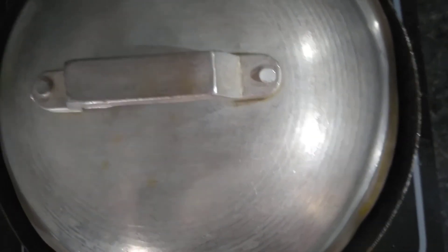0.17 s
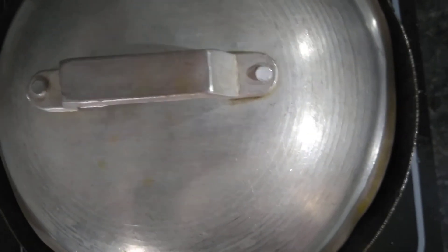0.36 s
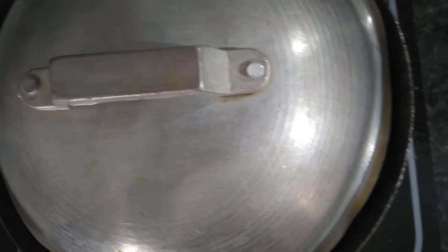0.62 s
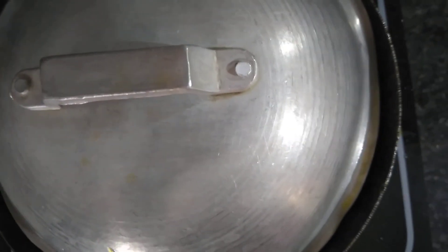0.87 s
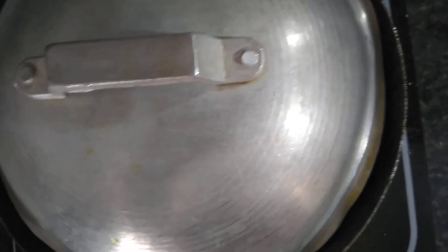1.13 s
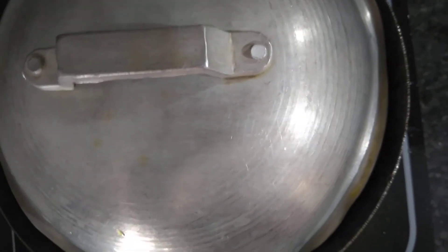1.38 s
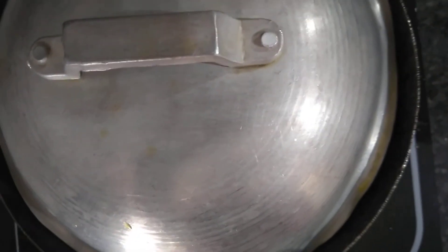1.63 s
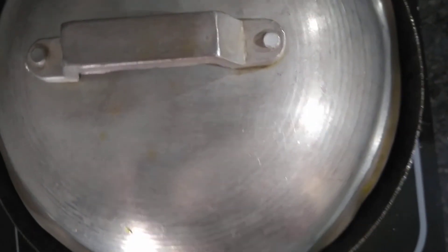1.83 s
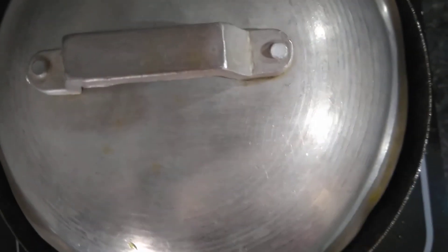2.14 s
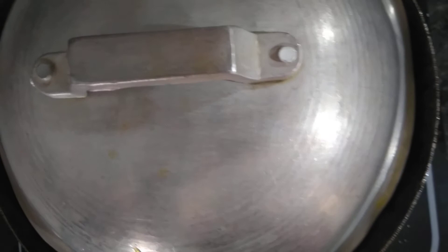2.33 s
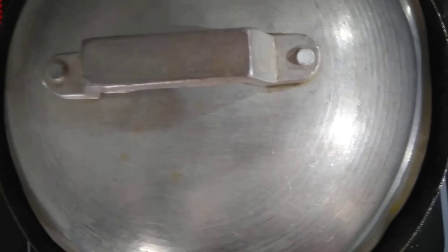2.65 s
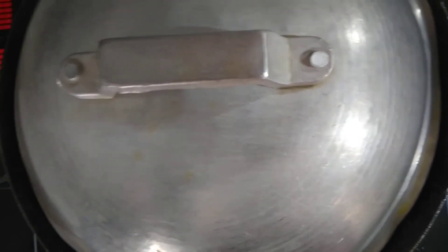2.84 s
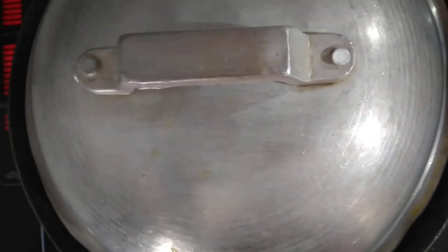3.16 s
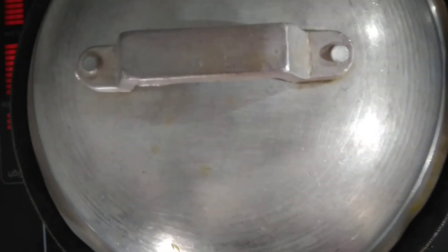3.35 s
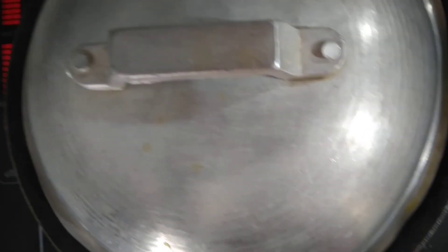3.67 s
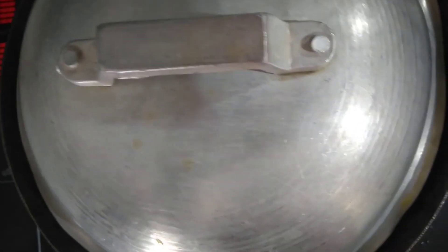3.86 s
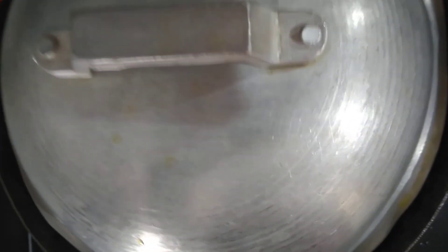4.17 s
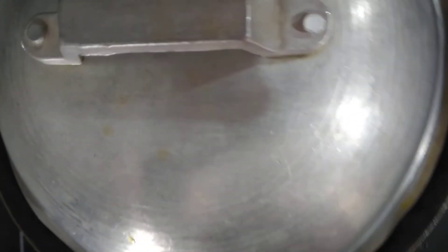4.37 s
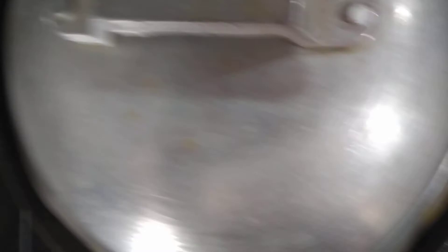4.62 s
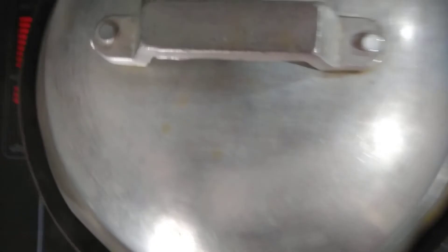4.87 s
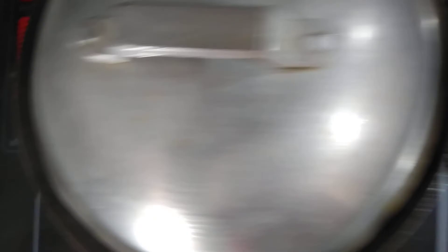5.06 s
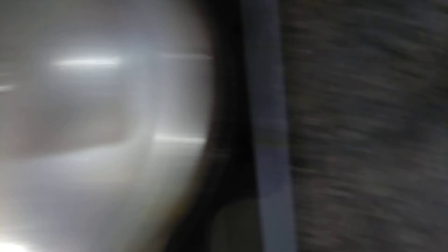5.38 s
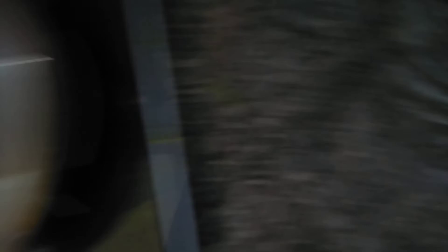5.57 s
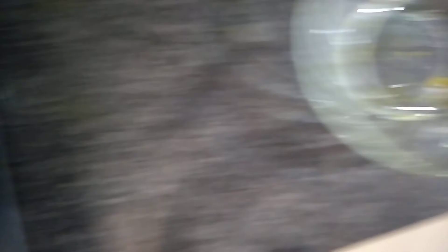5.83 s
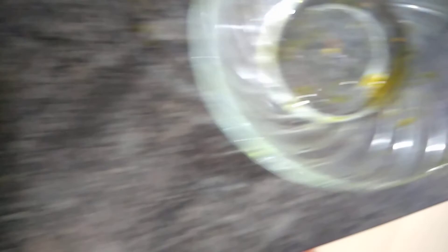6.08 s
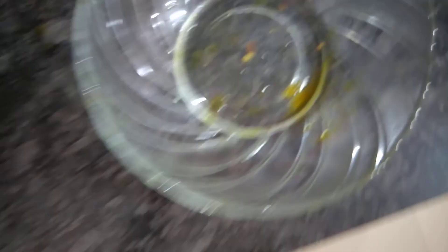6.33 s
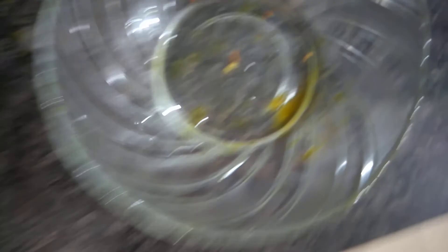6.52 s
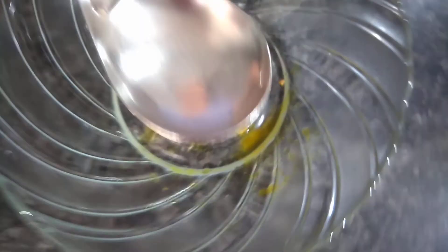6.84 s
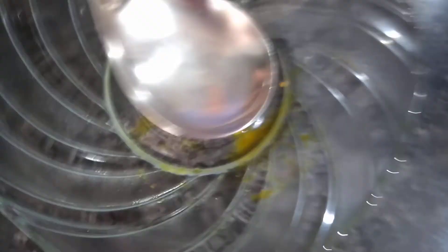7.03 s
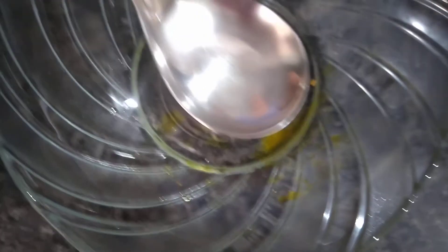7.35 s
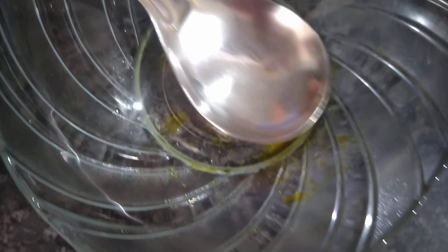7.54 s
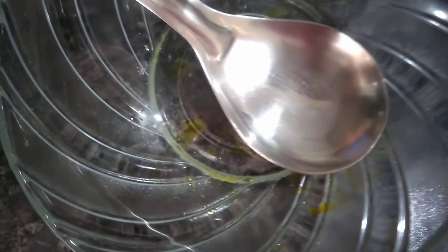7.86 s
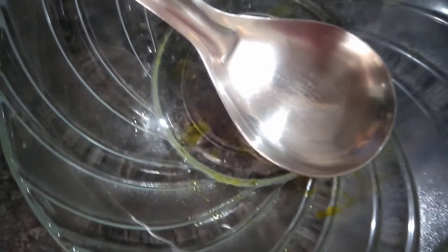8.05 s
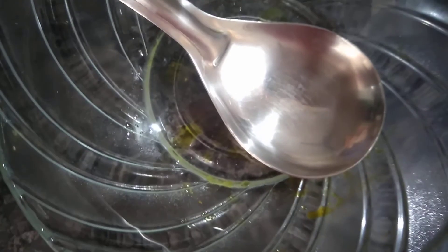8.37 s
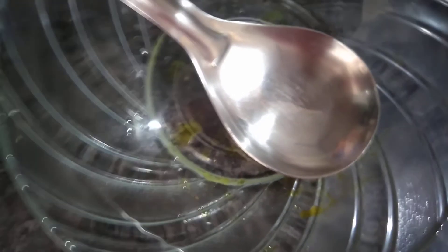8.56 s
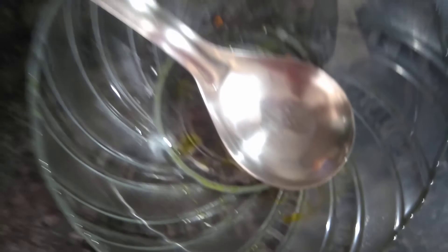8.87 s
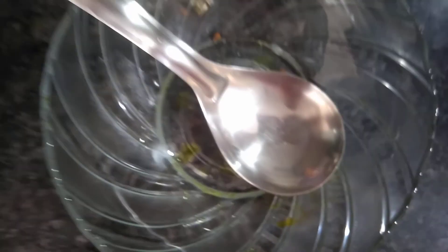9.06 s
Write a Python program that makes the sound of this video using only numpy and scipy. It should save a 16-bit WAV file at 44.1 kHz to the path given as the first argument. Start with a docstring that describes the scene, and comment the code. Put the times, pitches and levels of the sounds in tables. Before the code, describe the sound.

A handheld stereo microphone hovers over a lidded pan: hollow low bubbles, small pops, foamy crackle and wet hissing spits, with a soft fan underneath. A few bright clinks of cutlery, a tick and a sharp metal dish clank interrupt. As it swings away past the fan vent, a thin whine swells, the boil fades, gritty spoon slides follow, then a rapid ringing rattle of spoon in glass.

```python
"""Curry boiling under a lid

Curry boils under a steel lid on an electric cooktop whose fan hums; the microphone drifts from the pan to the counter.
Big bubbles glug in the air under the lid, small ones pop at their own pitches, and wet spits hiss at the rim.
Cutlery and a steel dish clink and rebound as groups of ringing modes, with rattling noise around them.
A spoon is slid off the counter with gritty noise and rattles into a glass bowl, whose foot rocks on the stone."""
import sys
import numpy as np
from scipy import signal
from scipy.fft import rfft, irfft, next_fast_len
from scipy.io import wavfile
from scipy.ndimage import uniform_filter1d, map_coordinates

SR = 44100
rng = np.random.default_rng(int(sys.argv[2]) if len(sys.argv) > 2 else 0)


def to_wav(s):
    """Save 16-bit WAV."""
    ch = np.atleast_2d(s).T  # columns
    pcm = np.round(np.clip(ch, -1, 1) * 32767)  # PCM
    wavfile.write(sys.argv[1], SR, pcm.astype(np.int16))


N = 405719

# clear modes (single ringing pitches) of each utensil, the glass bowl and its foot: (pitch [Hz], level [dB])
FORK = [(5816, -10.5), (7953, -10), (8430, -3), (9017, 2), (9342, 0), (9983, -6), (10214, -7), (10475, 2.5),
        (11872, -1), (12311, -8), (12798, -5), (13995, 1.5)]
SPOON = [(1790, -17), (2613, -20.5), (2820, -19), (3536, -6), (5776, -15.5), (6861, -7.5), (7980, -17),
         (8422, -4), (9345, 2.5), (10240, -10), (10440, -13), (12460, -1), (12927, -21), (14195, -14)]
TEA_SPOON = [(4990, -12), (5805, -8), (9959, -2), (10222, -3), (11894, -7), (12817, 0)]
STEEL_DISH = [(1900, -13), (3040, -8.5), (3890, -10), (6715, -4.5), (7495, -1), (7815, -16), (9350, -0.5),
              (9883, -7), (10256, -6), (11960, -7)]
GLASS_BOWL = [(654, -14), (1055, -4.5), (1170, -7), (2430, -6), (4480, -12.5), (6878, -2), (8430, -3),
              (9028, -3.5), (9366, -7), (9830, 0), (10480, -4)]
BOWL_FOOT = [(1039, -13), (1560, -2), (3908, -5), (4486, -4), (4710, -4.5)]
KNIFE = [(4030, 0), (5450, -2)]
# each utensil's crowd of weaker modes: (frequency [Hz], level [dB per Hz])
FORK_CROWD = [(5000, -14.5), (6200, -4), (6900, 3), (9500, -2), (13000, -5.5), (15800, -9)]
SPOON_CROWD = [(1000, -19), (3450, -10.5), (4240, -14), (5650, -6.5), (8160, -4), (15500, -7)]
STEEL_DISH_CROWD = [(700, -17), (1850, -12.5), (5500, -10), (7200, -6), (12500, -9), (15800, -18)]
GLASS_BOWL_CROWD = [(560, -7), (1200, 3), (2300, -5), (5700, -6), (6800, -0.5), (7600, -12), (8300, -2.5),
                    (10500, -5), (11200, -7), (12000, -4), (15800, -14)]
BOWL_FOOT_CROWD = [(550, -7), (1400, -10), (2700, -19.5), (4400, -4), (6000, -33)]
KNIFE_CROWD = [(2800, -20), (4000, -2), (9500, 4.5), (12000, -2), (13500, -21)]
# spectrum of hissing steam, spits and scrapes: (frequency [Hz], level [dB per Hz])
HISS = [(1500, -27), (4000, -8), (6500, 0.5), (9500, 0), (12000, -9.5), (15500, -19)]
TOP_HZ = 16000  # nothing much above this passes the microphone
BLUR_HZ = 87  # chatter and room widen each utensil mode into a band


def amp(db):
    """Decibels to gain."""
    return 10 ** (np.asarray(db) / 20)


def unit(x):
    """Scale to an rms (average strength) of 1."""
    return x / np.sqrt(np.mean(x ** 2) + 1e-20)


def along(points, hz):
    """Values at hz from (Hz, value) points joined on a log axis."""
    point_hz, value = np.transpose(points)
    return np.interp(np.log(hz + 1), np.log(point_hz + 1), value)


def wobble(rate):
    """A smooth random curve with rate knots a second."""
    knots = rng.standard_normal(int(N * rate / SR) + 4)
    return map_coordinates(knots, [np.arange(N) * rate / SR])


def filtered(x, response):
    """x with each frequency multiplied by the response there."""
    n = x.shape[-1]
    padded = next_fast_len(n + SR // 5)
    f = np.fft.rfftfreq(padded, 1 / SR)
    return irfft(rfft(x, padded) * response(f), padded)[..., :n]


def resonances(modes, f):
    """Response of (Hz, width, dB) resonances that ring only after the push; neighbours have opposite signs."""
    total = 0
    for k, (hz, width, db) in enumerate(sorted(modes)):
        total = total + (-1) ** k * amp(db) * 1j * f * width / (hz * hz - f * f + 1j * f * width)
    return total


def coloured(x, spectrum):
    """x with the given spectrum, at rms 1."""
    return unit(filtered(x, lambda f: amp(along(spectrum, f))))


def noise():
    """Stereo white noise, left and right most alike in the bass and unrelated in the treble."""
    # likeness of left and right: (frequency [Hz], correlation [-1 to 1])
    likeness = [(60, 0.6), (130, 0.76), (300, 1), (640, 0.04), (1400, -0.15), (3000, 0)]

    def shares(f):
        turn = np.arccos(np.clip(along(likeness, f), -1, 1)) / 2
        return np.array([np.cos(turn), np.sin(turn)])
    mid, side = filtered(rng.standard_normal((2, N)), shares)
    return np.array([mid + side, mid - side])


def pan(db):
    """Left and right gains for a level difference; positive is louder on the left."""
    return amp([[db / 2], [-db / 2]])


def fade(t, rise, t60):
    """A rise, then an exponential decay that falls 60 dB in t60 seconds."""
    return (1 - np.exp(-t / max(rise, 1e-5))) * np.exp(-np.log(1000) * t / t60)


def add(track, s, sound):
    """Mix a sound into the track at time s."""
    part = track[:, round(s * SR):][:, :sound.shape[-1]]
    part += sound[..., :part.shape[-1]]


def kitchen(x, wet_db, t60):
    """x with the echo of hard kitchen walls, made of decaying noise."""
    t = np.arange(SR // 2) / SR
    tail = rng.standard_normal((2, len(t))) * fade(t, 0.0004, t60)
    echo = signal.fftconvolve(x, tail / np.linalg.norm(tail[0]), axes=1)[:, :N]
    return x + amp(wet_db) * echo


def bursts(rate, spread_db, t60):
    """Envelope of rms 1 made of randomly timed, randomly sized bursts, rate of them a second."""
    draws = rng.random((int(rate * N / SR), 2))
    starts = (draws[:, 0] * N).astype(int)
    power = np.bincount(starts, amp(spread_db * draws[:, 1]) ** 2, N)
    shape = fade(np.arange(SR // 4) / SR, 0.00044, t60) ** 2
    return unit(np.sqrt(np.abs(signal.fftconvolve(power, shape)[:N])))


def patchy(x, depth_db, size):
    """x with a random gain that drifts over time and frequency, size = (bins, frames) of a patch."""
    z = signal.stft(x, nperseg=512)[2]
    field = rng.standard_normal(z.shape[1:])
    field = uniform_filter1d(field, size[0], 0)
    field = uniform_filter1d(field, size[1], 1)
    return signal.istft(z * amp(depth_db * unit(field)), nperseg=512)[1][:, :N]


def microphone_nearness():
    """Gain of the pan as the microphone hovers over the lid, then moves off to the counter."""
    # nearness of the pan: (time [s], level [dB])
    path = [(0, 0), (5.3, 0.5), (5.7, -6.5), (7, -12), (9.2, -9.5)]
    s, db = np.transpose(path)
    return amp(np.interp(np.arange(N) / SR, s, db))


def glugs(near):
    """Big bubbles throb in the air under the lid, over a constant churning."""
    # big bubbles: (time [s], level [dB], pitch [Hz])
    big_bubbles = [(0.324, -34.5, 303), (0.46, -39.5, 335), (0.902, -27, 381), (0.937, -34, 340),
                   (1.421, -31.5, 382), (1.476, -32, 367), (1.647, -33.5, 408), (1.877, -30.5, 353),
                   (1.913, -28.5, 347), (2.28, -39.5, 334), (2.639, -30.5, 378), (3.925, -29, 347),
                   (4.259, -31.5, 347), (4.312, -30, 365.5), (4.651, -34, 360), (4.781, -32, 353),
                   (5.15, -33.5, 339), (5.231, -38, 345), (5.402, -38, 327), (6.175, -35.5, 327),
                   (6.471, -34.5, 337), (7.999, -33, 331), (8.411, -33, 324)]
    # low resonances of the air under the lid: (pitch [Hz], width [Hz], level [dB])
    lid_low = [(332, 16.7, 2), (377, 45, -2.5), (500, 29, -12.5), (604, 15, -16), (242, 54.4, -8.5)]
    # a big bubble collapses in three throbs: typical gap, loss each throb, pitch scatter (share)
    throb_s, throb_loss_db, throb_scatter = 0.016, 5.5, 0.1
    # churning follows nearness, but its bass carries: level at the pan, dB per dB of nearness
    churn_db, churn_falloff = -51.5, 0.74
    out, t = np.zeros((2, N)), np.arange(SR // 5) / SR
    for s, db, hz in big_bubbles:
        for k, (late, detune) in enumerate(rng.uniform(-1.06, 1, (3, 2))):
            pitch = hz * (1 + k * throb_scatter * detune)
            throb = fade(t, 0.0016, 0.06) * np.sin(2 * np.pi * pitch * t)
            start = s + k * throb_s * (1 + 0.305 * late)
            add(out, start, amp(db + 4.5 - k * throb_loss_db) * throb)
    gusts = noise() * bursts(rate=90, spread_db=13.5, t60=0.039)
    churn = unit(filtered(gusts, lambda f: resonances(lid_low, f)))
    return kitchen(out, wet_db=-8.5, t60=0.67) + amp(churn_db) * near ** churn_falloff * churn


def blips(near):
    """Small bubbles ring briefly, rising in pitch as they reach the surface; the smaller, the higher and fainter."""
    out, t = np.zeros((2, N)), np.arange(SR // 12) / SR
    for when, smallness, strength, side in rng.random((int(120 * N / SR), 4)):
        hz = 430 * 9 ** smallness
        phase = 2 * np.pi * hz * (t + 2 * t ** 2)
        level = amp(-56.5 + 10 * strength ** 2 - 1.6 * smallness)
        blip = fade(t, 0.0013, 36 / hz) * np.sin(phase)
        add(out, when * N / SR, level * pan(8 * (side - .5)) * blip)
    return near * kitchen(out, wet_db=0.0, t60=0.21)


def foam(near):
    """Patches of foam collapse: each is a quick sputter of very short bubbles of roughly one size."""
    # patches a second, length of one, base level
    patch_rate, patch_s, foam_db = 26, .035, -51.5
    # lowest patch pitch and the range above it, before each bubble's detuning
    low_hz, span_hz = 1540, 2400
    out, t = np.zeros((2, N)), np.arange(SR // 50) / SR
    patches = rng.random((int(patch_rate * N / SR), 4))
    patch_bubbles = rng.random(size=(len(patches), 12, 3))
    for (when, smallness, strength, side), bubbles in zip(patches, patch_bubbles):
        for late, detune, faintness in bubbles:
            hz = (low_hz + span_hz * smallness) * (1 + .5 * (detune - .5))
            level = amp(foam_db + 12.7 * strength ** 2 - 14.8 * faintness)
            snap = fade(t, 0.00014, 16 / hz) * np.sin(2 * np.pi * hz * t)
            add(out, when * N / SR + patch_s * late, level * pan(10 * (side - .5)) * snap)
    return near * kitchen(out, wet_db=1, t60=0.067)


def pops(near):
    """Bursting bubbles each pop at their own pitch, over a run of puffs ringing the lid's cavity."""
    # small bubbles bursting: (time [s], level [dB], pitch [Hz])
    small_bubbles = [(2.505, -31.5, 1535), (2.683, -35.5, 1540), (2.762, -39.5, 2330), (2.8284, -36, 1560),
                     (2.831, -39, 2400), (2.9016, -30.5, 3040), (3.082, -39, 3110), (3.231, -41, 2450),
                     (3.281, -40.5, 2620), (4.9116, -34, 3140), (5.308, -39.5, 1530), (5.3989, -35.5, 1580)]
    # high resonances of the air under the lid: (pitch [Hz], width [Hz], level [dB])
    lid_high = [(1505, 27, -2), (1823, 105, -10), (2400, 27, -4.5), (3040, 100, -3), (3980, 45, -4)]
    out, t = np.zeros((2, N)), np.arange(SR // 6) / SR
    for s, db, hz in small_bubbles:
        puff = rng.standard_normal((2, len(t))) * (fade(t, 0, 0.0083) + 1.1 * fade(t, 0, 0.14))
        ring = filtered(puff, lambda f: resonances([(hz, 140, 0)], f) * resonances([(hz, 900, 0)], f))
        add(out, s, amp(db + 0.5) * ring / np.abs(ring).max())
    for hz, width, db in lid_high:
        puffs = noise() * bursts(rate=36, spread_db=13.5, t60=0.12)
        ring = unit(filtered(puffs, lambda f: resonances([(hz, width, 0)], f)))
        out += amp(-59.5 + db) * near * ring
    return out


def sizzle(near):
    """Steam hisses from under the lid, countless tiny bubbles fizz, and drops spit at the hot rim."""
    # wet spits: (time [s], level [dB])
    spits = [(0.309, -33), (0.449, -32.5), (1.643, -34.5), (1.6795, -32), (2.246, -36), (2.758, -35.5),
             (2.914, -33.5), (2.974, -36.5), (3.184, -39.5), (3.325, -34), (3.49, -36.5), (3.749, -32),
             (3.968, -36), (4.209, -29.5), (4.786, -29), (4.9118, -26.5), (4.975, -32)]
    # spectrum of the fizzing bubbles: (frequency [Hz], level [dB per Hz])
    fizz_spectrum = [(290, -29), (500, -15.5), (737, -11.5), (1290, -14), (1490, 0), (2130, -42),
                     (2390, -20), (4440, -14.5), (9650, -14.5), (15500, -20)]
    steam = coloured(patchy(noise(), depth_db=4, size=(12, 14)), HISS)
    tiny_bubbles = noise() * bursts(rate=150, spread_db=23, t60=0.1)
    fizz = coloured(patchy(tiny_bubbles, depth_db=3, size=(9, 7)), fizz_spectrum)
    out, t = np.zeros((2, N)), np.arange(SR // 5) / SR
    for s, db in spits:
        hiss = coloured(rng.standard_normal((2, len(t))), HISS)
        add(out, s, amp(db - 14.5) * hiss * fade(t, 0.00069, 0.25))
    return patchy(out, depth_db=6, size=(6, 20)) + near * (amp(-57) * fizz + amp(-61) * steam)


def utensil(modes, crowd, clear_db, t60, t, count=90):
    """Pitches, strengths and decaying partials of a utensil's clear and weaker modes, and the bands they blur into."""
    clear_hz, mode_db = np.transpose(modes)
    clear = amp(clear_db) * amp(mode_db) / np.linalg.norm(amp(mode_db))
    crowd_hz = np.linspace(crowd[0][0], crowd[-1][0], count) + rng.uniform(-70, 70, count)
    weak = amp(along(crowd, crowd_hz) + rng.uniform(-6, 6, count))
    weak = weak / np.linalg.norm(weak)
    hz = np.r_[clear_hz, crowd_hz]
    grid = np.arange(0, SR // 2, 10)
    # clear modes count for less in the blur, weak ones for less in the ring
    band_shapes = (1 + ((grid - hz[:, None]) / BLUR_HZ) ** 2) ** -2
    power = np.r_[amp(-4) * clear, weak] ** 2 @ band_shapes
    partials = np.exp((2j * np.pi * hz[:, None] - np.log(1000) / t60) * t)
    return hz, np.r_[clear, amp(-7) * weak], partials, (grid, np.sqrt(power))


def clinks():
    """Each contact rings a utensil's modes at new strengths; the metal chatters and the room blurs the ring at each port."""
    # every landing and rebound of a utensil: (time [s], level [dB], utensil)
    contacts = [(.349, -34.5, "teaspoon"), (.361, -34, "teaspoon"), (.411, -41, "knife"),
                (.579, -21, "fork"), (0.594, -20, "fork"), (.683, -26.5, "fork"), (.703, -29.5, "fork"),
                (.783, -37, "fork"), (2.059, -33, "knife"), (5.052, -19.5, "dish"), (5.063, -17, "dish"),
                (5.14, -35, "dish"), (6.2515, -25.5, "spoon"), (6.289, -42, "spoon"),
                (7.4633, -19.5, "glass"), (7.481, -20.5, "glass"), (7.508, -26.5, "glass"),
                (7.52, -24, "glass"), (7.531, -27, "glass"), (7.586, -29, "glass"), (7.596, -26, "glass"),
                (7.606, -25, "glass"), (7.658, -29, "glass"), (7.679, -32, "glass"), (7.693, -28, "glass"),
                (7.712, -25, "foot"), (7.721, -25, "foot"), (7.726, -28.5, "glass"), (7.733, -26.5, "foot"),
                (7.741, -20, "spoon"), (7.744, -29.5, "foot")]
    # by name: (clear modes, crowd, clear modes level [dB], blur level [dB], rise [s],
    # time to fall 60 dB [s], left-right difference [dB])
    utensils = {"fork": (FORK, FORK_CROWD, 0, -4, 0.0041, 0.29, 4),
                "teaspoon": (TEA_SPOON, FORK_CROWD, -1, -1, 0.0017, 0.2, 3.9),
                "dish": (STEEL_DISH, STEEL_DISH_CROWD, 0.56, -1, 0.0036, 0.17, 3.7),
                "spoon": (SPOON, SPOON_CROWD, 1, -1, 0.00056, 0.22, 2.3),
                "glass": (GLASS_BOWL, GLASS_BOWL_CROWD, 0, -0.8, 0.001, 0.19, -2),
                "foot": (BOWL_FOOT, BOWL_FOOT_CROWD, 0.5, 0, 0.00092, 0.13, -4.5),
                "knife": (KNIFE, KNIFE_CROWD, -11, 0.0087, 0.00037, 0.29, 0)}
    # each utensil's low rattle, below this pitch, falls 60 dB in this shared time
    low_below_hz, low_t60_s = 1600, 0.16
    # the ring reaches the left port later; the room scatters its phase
    port_lag_s, phase_scatter_rad = 0.000385, 0.67
    # each contact starts with a dry knock above its ringing: excess and decay
    knock_db, knock_s = 3.5, 0.0029
    out, t = np.zeros((2, N)), np.arange(SR // 3) / SR
    chatter = bursts(rate=650, spread_db=14, t60=0.063)
    knock = amp(knock_db * np.exp(-t / knock_s))
    for name, (modes, crowd, clear_db, blur_db, rise, t60, side_db) in utensils.items():
        hz, size, partials, bands = utensil(modes, crowd, clear_db, t60, t)
        for s, db in [(s, db) for s, db, which in contacts if which == name]:
            # the point of contact favours some groups of modes over others
            spot_db = rng.uniform(-4, 4, 36)
            spot_hz = np.linspace(0, TOP_HZ, len(spot_db))
            colour = lambda f: (f > 560) * amp(np.interp(f, spot_hz, spot_db))
            strength = size * colour(hz) * amp(2 * rng.standard_normal((2, len(hz))))
            strength = np.sqrt(2) * strength / np.linalg.norm(strength, axis=1, keepdims=True)
            phase = 2 * np.pi * (rng.random(len(hz)) - np.outer([port_lag_s, 0], hz))
            phase = phase + phase_scatter_rad * rng.standard_normal(phase.shape)
            ring = ((strength * np.exp(1j * phase)) @ partials).real
            rattle = rng.standard_normal((2, len(t))) * chatter[round(s * SR):][:len(t)]
            blur = unit(filtered(rattle, lambda f: np.interp(f, *bands) * colour(f)))
            low = filtered(blur, lambda f: f < low_below_hz)
            blur = low * fade(t, rise, low_t60_s) + (blur - low) * fade(t, rise, t60)
            # the partials already decay, so the ring needs only its rise
            sound = ring * fade(t, rise, np.inf) + amp(blur_db) * blur
            add(out, s, amp(db) * pan(side_db) * knock * sound)
    return out


def scrapes():
    """The spoon slides: gritty friction swells and fades, and stirs the spoon's modes."""
    # slides of the spoon: (middle [s], half length [s], level [dB])
    slides = [(6.125, 0.033, -55), (6.196, 0.051, -47), (6.96, 0.036, -60.5)]
    grit = noise() * bursts(rate=1600, spread_db=10, t60=0.026)
    spoon_bands = [(hz, BLUR_HZ, db) for hz, db in SPOON]
    steel = unit(filtered(grit, lambda f: resonances(spoon_bands, f)))
    time = np.arange(N) / SR
    stroke = sum(amp(db) * np.exp(-((time - s) / half) ** 2) for s, half, db in slides)
    return stroke * (coloured(grit, HISS) + amp(-13) * steel)


def ticks():
    """Sharp ticks: hard, dry knocks and the crack of a spitting drop, each a cycle or two, then the room."""
    # sharp ticks: (time [s], level [dB], pitch [Hz], width [Hz], left-right difference [dB])
    sharp_ticks = [(2.063, -19, 5500, 4600, -4), (4.2098, -36, 6000, 6000, 3), (5.0648, -13, 7860, 7000, 4),
                   (7.22, -16, 2140, 2270, -5), (7.2212, -28, 1160, 900, -12),
                   (8.094, -37.5, 5500, 3970, -7)]
    out, impulse = np.zeros((2, N)), signal.unit_impulse(SR // 50)
    for s, db, hz, width, side_db in sharp_ticks:
        tick = filtered(impulse, lambda f: resonances([(hz, width, 0)], f) ** 4)
        add(out, s, amp(db) * pan(side_db) * tick / np.abs(tick).max())
    return kitchen(out, wet_db=-6, t60=.2)


def cooktop(near):
    """The cooling fan: air noise, an unsteady hum, and a thin whine that swells with the draught at the vent."""
    # spectrum of the fan's air noise: (frequency [Hz], level [dB per Hz])
    fan_spectrum = [(25, -12), (85, -3.5), (192, -9.5), (341, 3), (673, -15.5), (3880, -21), (4310, -23.5),
                    (4660, -15.5), (5590, -22), (6050, -24), (6720, -26.5), (9430, -23.5), (15500, -39.5)]
    # the microphone crosses the fan's vent: moment, half length, draught there and over the pan
    vent_at_s, vent_half_s, vent_db, vent_pan_db = 5.46, 0.21, 4, -16

    def tone(hz, drift_hz, rate):
        turns = np.cumsum(hz + drift_hz * wobble(rate)) / SR
        return np.sqrt(2) * np.sin(2 * np.pi * turns)
    crossing = np.exp(-((np.arange(N) / SR - vent_at_s) / vent_half_s) ** 2)
    vent = amp(vent_pan_db) * near + amp(vent_db) * crossing
    air = amp(-51.5) * coloured(patchy(noise(), depth_db=4.5, size=(3, 24)), fan_spectrum)
    hum = amp(-70.5 + 7.9 * near + 0.73 * wobble(10)) * tone(hz=125.0, drift_hz=4.97, rate=25)
    whine = amp(-63 + 1.6 * wobble(8)) * vent ** 0.42 * tone(hz=1090.0, drift_hz=4.12, rate=30)
    draught_spectrum = [(600, -23), (1100, 5), (1450, -7), (2500, -24.0), (5000, -40.0)]
    draught = amp(-62.0) * vent * coloured(noise(), draught_spectrum)
    return air + hum + whine + draught


def scene():
    """The pan, the utensils and the cooktop."""
    near = microphone_nearness()
    boil = glugs(near) + blips(near) + foam(near) + pops(near) + sizzle(near)
    return boil + clinks() + scrapes() + ticks() + cooktop(near)


def record(dry):
    """The two microphone ports differ in colour; deep rumble is cut and nothing passes above the band limit."""
    # colour of the ports: (frequency [Hz], left-right difference [dB])
    ports = [(60, -4), (120, -2.5), (380, -2.5), (800, -6), (1400, -3), (2400, -5.5), (4400, -2),
             (6500, -2), (9000, 9.5), (12000, 6), (15000, -6.5)]

    def response(f):
        port_gains = amp(np.outer([.5, -.5], along(ports, f)))
        low_cut = (1j * f / (1j * f + 30)) ** 3
        top_cut = np.clip((TOP_HZ - f) / 400 + .5, 0, 1)
        return port_gains * low_cut * top_cut
    return filtered(dry, response)


dry = scene()
out = record(dry)
to_wav(out)
```